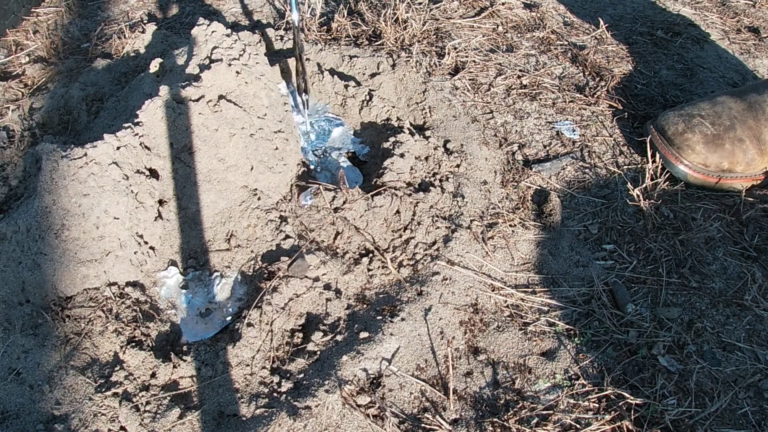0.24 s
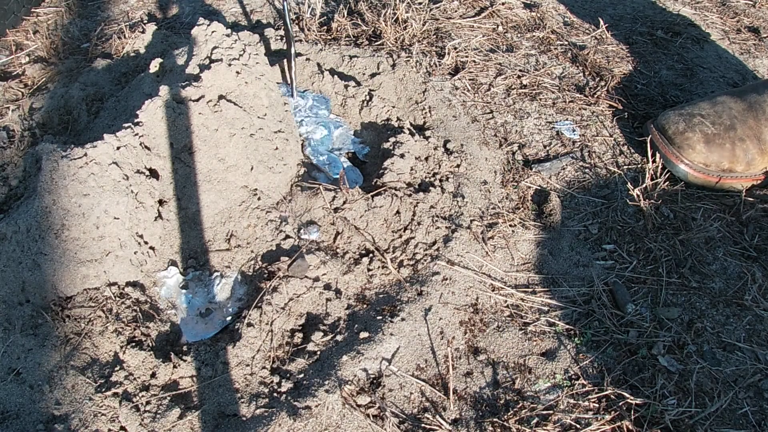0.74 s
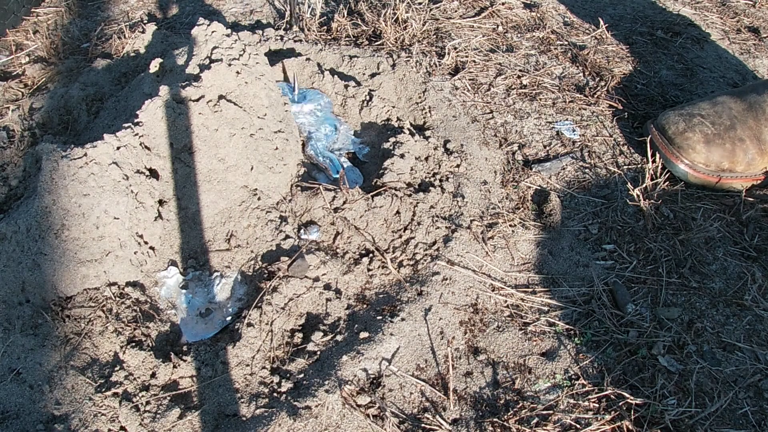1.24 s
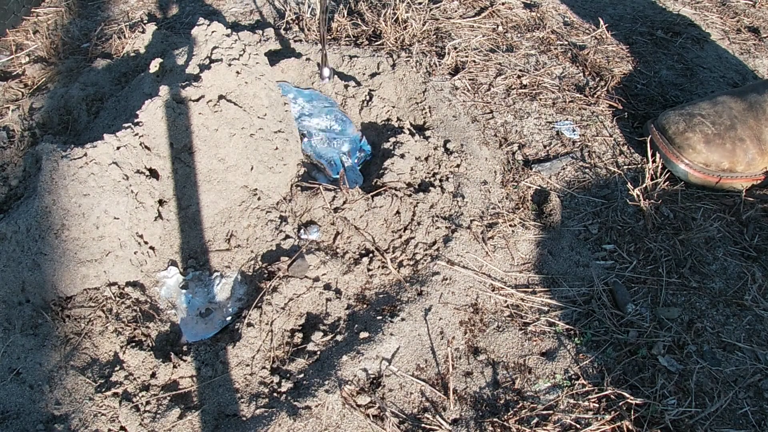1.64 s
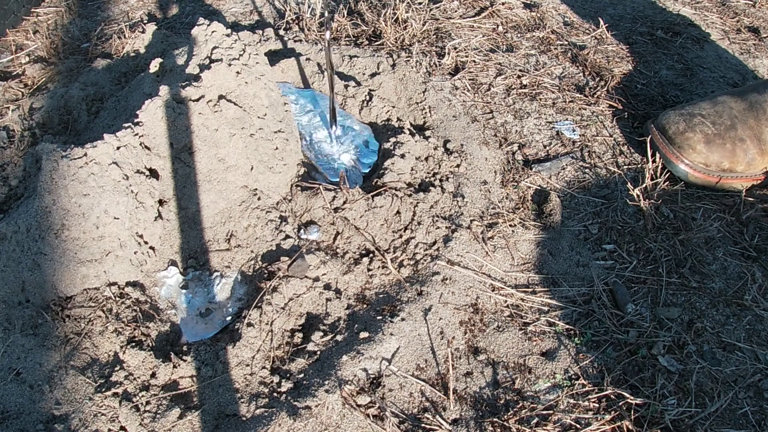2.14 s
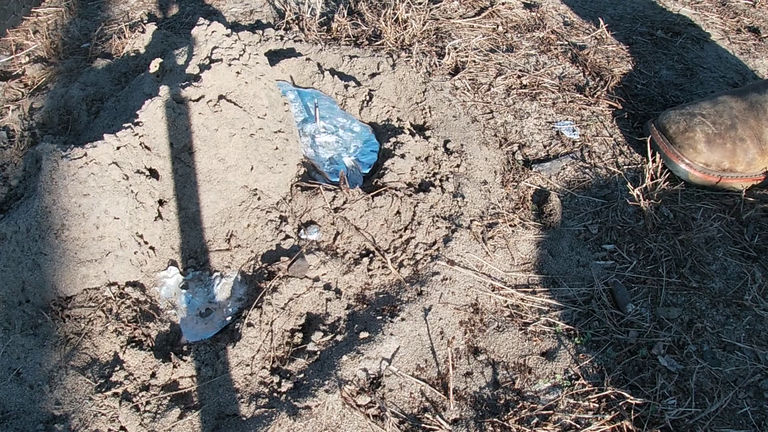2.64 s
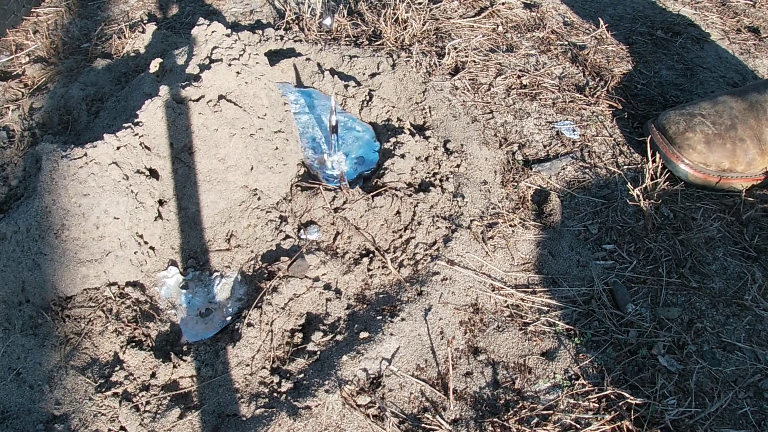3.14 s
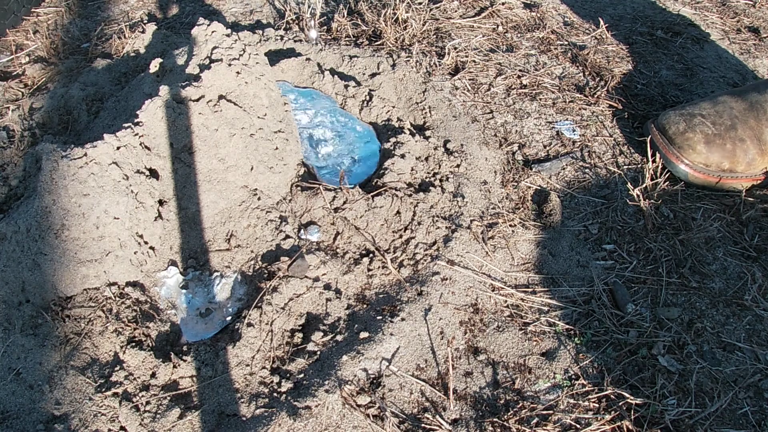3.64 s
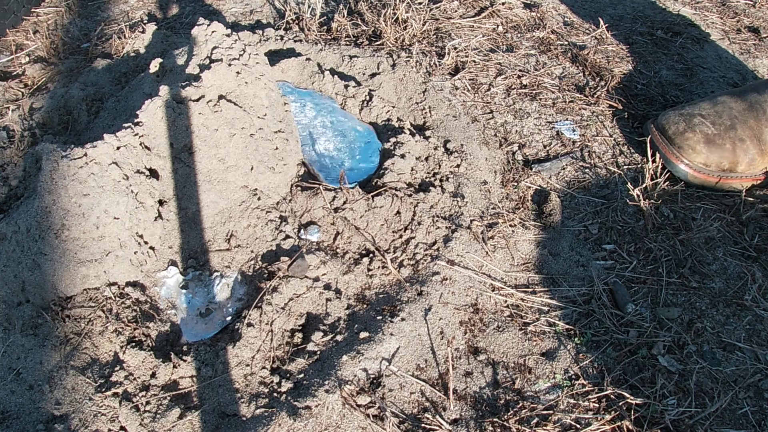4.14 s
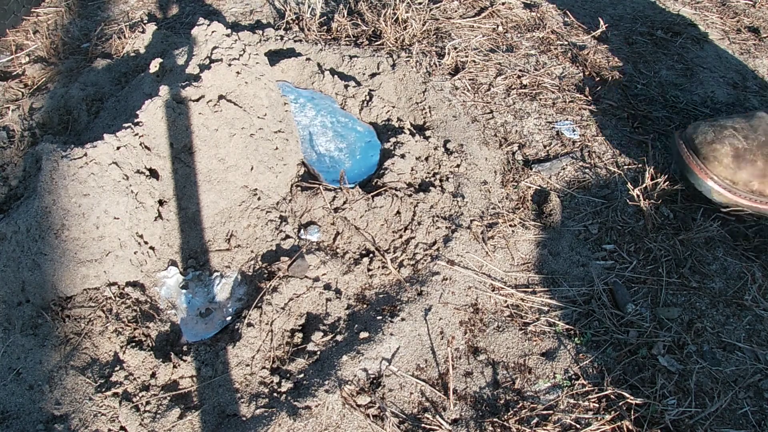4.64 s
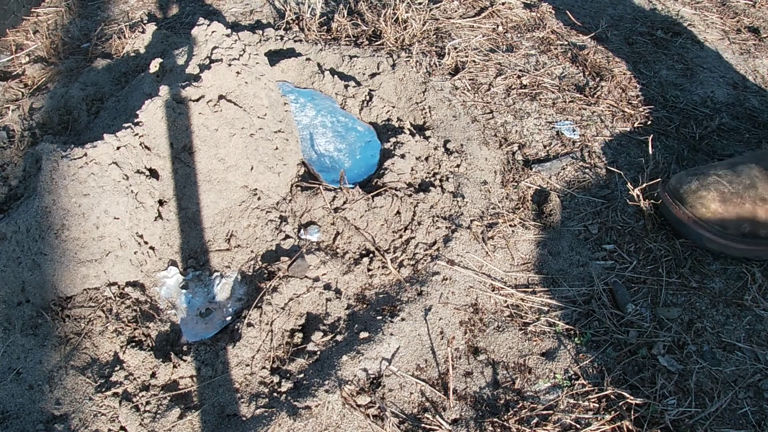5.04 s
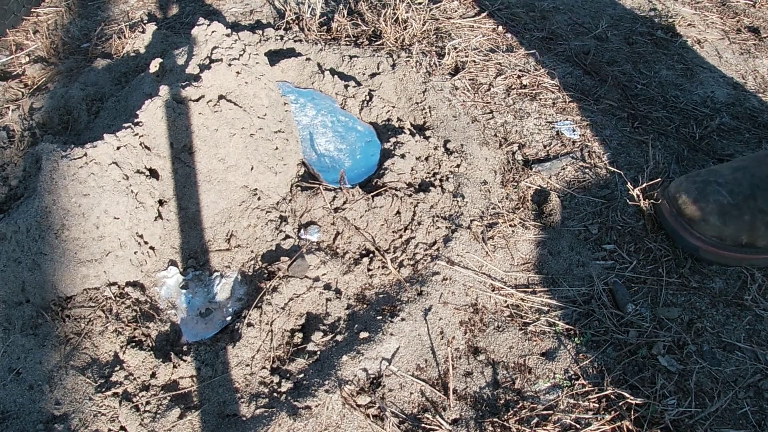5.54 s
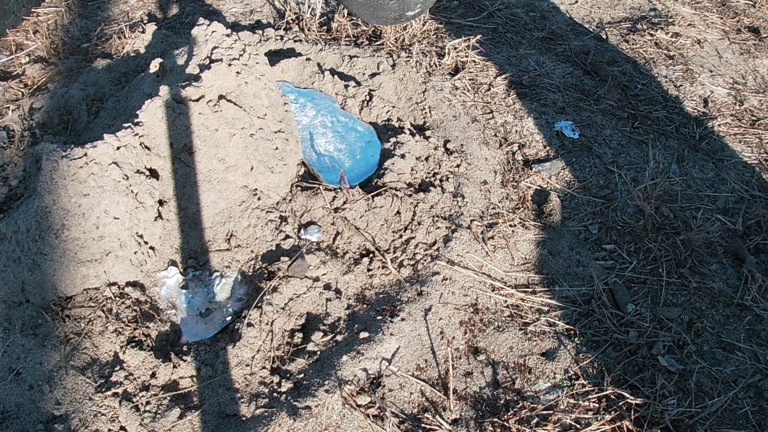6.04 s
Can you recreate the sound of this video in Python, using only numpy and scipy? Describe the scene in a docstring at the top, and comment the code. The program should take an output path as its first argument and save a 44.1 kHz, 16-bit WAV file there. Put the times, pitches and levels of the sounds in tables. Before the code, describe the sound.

Constant deep rushing of a metal-melting furnace flame, fluttering over a motor-like hum that fades and swells, with a sharp tick and a late soft thud.

```python
"""A burner flame, fed by a blower, roars in a small metal-melting furnace outdoors: low noise with gusts and booms.
The blower hums in orders of its turn; the third comes and goes, then swells to a drone.
The burner pipe sings faintly, a wavering tone in narrow noise; a thin overtone of the furnace lies below it.
The air jet is three bands of hiss, chopped once a turn and coloured by resonances.
A few dry ticks and one dull knock come from the work nearby."""
import sys
import numpy as np
from scipy import signal
from scipy.fft import rfft, irfft
from scipy.io import wavfile
from scipy.ndimage import uniform_filter1d

SR = 44100
rng = np.random.default_rng(int(sys.argv[2]) if len(sys.argv) > 2 else 0)


def pcm_store(signal):
    """Save signal as 16-bit PCM."""
    levels = np.round(np.clip(np.atleast_2d(signal), -1, 1) * 32767)
    wavfile.write(sys.argv[1], SR, levels.astype(np.int16).T)


N = 276948
TIME = np.arange(N) / SR
HZ = np.fft.rfftfreq(N, 1 / SR)
# third order of the hum, ringing in the furnace: (time [s], level [dB rms])
DRONE = [(0, -42), (.58, -27.5), (1.1, -42), (1.6, -37), (2.15, -42), (3.3, -31), (3.65, -34), (3.92, -38),
         (4.13, -30), (4.25, -34), (4.38, -27.5), (4.59, -33), (4.65, -25), (4.78, -22), (4.9, -27),
         (5.15, -24.5), (5.55, -24.5), (5.65, -25.5), (5.75, -22.5), (5.98, -24), (6.25, -21)]


def flame(base_db=-23.5, yield_db=-0.96, flutter_db=0.97, gust_db=1.0, surge_db=0.83, gust_above_hz=260):
    """Turbulent burning: a low roar that flutters, gusts in its upper part, booms and eases as the drone swells."""
    # roar spectrum: (frequency [Hz], relative density [dB per Hz])
    roar_spectrum = [(10, -34.5), (25, -21), (50, -11), (90, -3), (140, -1), (210, 2), (255, -2),
                     (297, -13), (335, -11), (400, -19), (540, -26.5), (650, -25), (740, -44.5),
                     (1200, -58), (8000, -110)]
    # booms: (peak time [s], time to either side [s], frequency [Hz], half-width [Hz], level [dB rms])
    boom_rows = [(2.0, 1.33, 150, 24, -33), (3.4, 1, 337, 24, -44), (4.13, 0.03, 198, 19, -23),
                 (4.5, 0.042, 146, 7.4, -24), (5.5, 0.86, 434, 38, -47.5), (5.68, 0.064, 138, 20, -23)]
    roar = noise(spectrum(roar_spectrum))
    high_pass = 1 - 1 / (1 + (HZ / gust_above_hz) ** 8)
    upper = irfft(rfft(roar) * high_pass, N)
    lower = roar - upper
    roar = lower + upper * amp(gust_db * wander(16))
    booms = sum(amp(db) * bell(TIME, s, span_s) * resonance(hz, width_hz)
                for s, span_s, hz, width_hz, db in boom_rows)
    level_db = base_db + yield_db * swelling()
    level_db = level_db + flutter_db * wander(19) + surge_db * wander(1.6)
    return roar * amp(level_db) + booms


def swelling():
    """How far the drone has swelled: its amplitude relative to its peak, 0 to 1."""
    level_db = curve(DRONE)
    return amp(level_db - level_db.max())


def hum(turns, waver_db=1.0, drone_waver_db=0.2, drone_slip_cycles=0.037):
    """Orders of the blower's turn, shaken by the flame; the third wavers in strength and phase."""
    # steady orders: (multiple of turn rate [-], level [dB rms])
    steady_orders = [(1, -36), (2, -39), (5, -50)]
    orders = sum(amp(db + waver_db * wander(13)) * np.sin(2 * np.pi * (k * turns + rng.random()))
                 for k, db in steady_orders)
    third = np.sin(2 * np.pi * (3 * turns + drone_slip_cycles * wander(9)))
    third_gain = amp(curve(DRONE) + drone_waver_db * wander(9.3))
    return np.sqrt(2) * (orders + third * third_gain)


def pipe(sing_db=-42.5, fade_db_per_s=0.4, tone_db=-1.0, flutter_db=0.87, tone_flutter_db=2):
    """Air sings in the burner pipe: a wavering tone inside a fuzz of noisy resonances; the furnace adds an overtone."""
    # fuzz: (frequency [Hz], half-width [Hz], relative level [dB])
    fuzz_modes = [(865, 34, -2), (879, 33, -2)]
    # lulls: (deepest time [s], time to either side [s], change [dB])
    lull_rows = [(4.6, .6, -0.5), (5.3, 0.39, -4.5), (6.28, .2, -3.5)]
    # furnace overtone: (frequency [Hz], half-width [Hz])
    overtone_mode = (461.5, 14.4)
    # furnace overtone: (time [s], level [dB rms])
    overtone_level = [(.7, -48.5), (1.65, -46), (2.6, -44.5), (3.7, -51), (5.3, -44.5), (6.28, -51.5)]
    fuzz = sum(amp(db) * resonance(hz, width_hz) for hz, width_hz, db in fuzz_modes)
    pitch_hz = 888 + 7 * wander(7) + 12 * wander(35)
    tone = np.sqrt(2) * np.sin(2 * np.pi * np.cumsum(pitch_hz) / SR)
    lull_db = sum(db * bell(TIME, s, span_s) for s, span_s, db in lull_rows)
    # the lull acts on the tone and again on the whole, so the tone sinks furthest
    tone = tone * amp(tone_db + lull_db + tone_flutter_db * wander(30))
    level_db = sing_db - fade_db_per_s * TIME + lull_db + flutter_db * wander(43)
    whistle = evened(fuzz + tone) * amp(level_db)
    overtone = amp(curve(overtone_level)) * resonance(*overtone_mode)
    return whistle + overtone


def air(turns, rush_chop=0.021, nozzle_chop=0.047, hiss_chop=0.16, flicker_db=0.72,
        rush_trim_db=-0.52, nozzle_trim_db=0.22, hiss_trim_db=0.5):
    """The air jet: three bands of noise that throb once a blower turn, most deeply in the treble."""
    # spectra of the bands: (frequency [Hz], relative density [dB per Hz])
    rush_spectrum = [(100, -43), (400, -25.5), (700, -3.5), (1000, -1.5), (1250, -6), (1600, -2), (2100, 0),
                     (2400, -0.5), (2900, -23), (4000, -14), (7000, -45), (12000, -78.5)]
    nozzle_spectrum = [(1000, -66), (1800, -41.5), (2450, -11), (2680, 2.5), (3100, -5), (3400, -2.5),
                       (3900, -11.5), (6000, -50.5), (12000, -82)]
    hiss_spectrum = [(500, -49), (1500, -23.5), (3000, -6.5), (3600, -2), (4500, 1.5), (5000, -2),
                     (5550, -5.5), (6500, -2.5), (7700, -3), (8200, -8.5), (8800, -14.5), (10200, -23.5),
                     (11000, -31.5), (12300, -32), (15500, -41)]
    # levels of the bands before trim: (time [s], level [dB rms])
    rush_level = [(0.1, -43), (0.17, -42.5), (2.26, -42), (3.11, -40.5), (5.04, -41.5), (5.43, -40),
                  (6.13, -41), (6.2, -42.5)]
    nozzle_level = [(0.1, -45), (2.72, -44.5), (3.02, -42), (4.11, -45.5), (4.18, -49.5), (4.65, -51),
                    (5.37, -43.5), (6.08, -44), (6.2, -49.5)]
    hiss_level = [(0.0, -47), (0.35, -44), (0.49, -45), (1.31, -46), (1.52, -48), (2.64, -44),
                  (3.09, -41.5), (3.43, -44.5), (3.93, -41.5), (4.11, -42), (4.6, -49.5), (4.93, -44),
                  (5.21, -45.5), (5.33, -43), (6.09, -45.5), (6.28, -45)]
    # burner tube and furnace mouth resonances: (frequency [Hz], full width [Hz], gain [dB])
    colour_modes = [(998, 41, -4), (1075, 54, 1.5), (1244, 84, 4), (1355, 60, 5.5), (1940, 220, 0.5),
                    (2280, 130, -5), (2710, 110, 1), (2940, 80, -2.5), (2974, 67, 7), (3095, 60, 5.5),
                    (3850, 220, -1.5), (6270, 240, 2.5), (6640, 250, -4), (6910, 130, 4.5)]
    colour_db = sum(db / (1 + (2 * (HZ - hz) / width_hz) ** 2) for hz, width_hz, db in colour_modes)
    throb = np.cos(2 * np.pi * turns) * (1 + 0.2 * wander(20))
    throb = throb + 0.15 * np.cos(np.pi * turns)  # strong and weak turns alternate

    def band(points, level, trim_db, chop):
        """One coloured band of noise, chopped by the throb."""
        return noise(spectrum(points) + colour_db) * amp(curve(level) + trim_db) * (1 + chop * throb)

    rush = band(rush_spectrum, rush_level, rush_trim_db, rush_chop)
    nozzle = band(nozzle_spectrum, nozzle_level, nozzle_trim_db, nozzle_chop)
    hiss = band(hiss_spectrum, hiss_level, hiss_trim_db, hiss_chop)
    return drifting(rush + nozzle + hiss * amp(flicker_db * wander(27)))


def drifting(x, patchy_db=1.63, dull_above_hz=8000):
    """The jet's colour shifts: resonances swell, glide and fade, the top dulls briefly, fine ripples come and go."""
    # whistling bands: (peak time [s], time to either side [s], frequency [Hz], glide [Hz/s], width [Hz], gain [dB])
    swell_rows = [(.4, 1, 1040, -5, 60, 8.5), (.88, 0.51, 1392, 0, 69, 8), (.7, 1.1, 2380, 0, 55, 6),
                  (1.1, 0.47, 2860, -64, 300, 4), (1.2, 1.3, 8100, -150, 250, 6),
                  (1.5, 0.52, 3340, -52, 160, 2), (1.7, .35, 1100, -3, 170, 2.5),
                  (2.2, 0.55, 2000, -60, 300, 3.5), (2.4, 0.78, 3060, 1, 150, 4.5),
                  (3.05, 0.35, 1840, 48, 520, 3.5), (3.25, 0.3, 4150, -2, 800, 3),
                  (3.05, 0.26, 6220, -1, 280, 5), (3.1, 0.32, 9150, -1, 240, 5),
                  (3.35, 0.81, 1545, -170, 220, 4), (3.9, 0.65, 2070, 95, 220, 5),
                  (4.15, 0.35, 760, 2, 90, 7.5), (5.3, 1.1, 1070, 0, 91, 5),
                  (5.38, 0.11, 1360, -150, 100, 8), (5.55, 0.59, 2520, -6, 300, 3),
                  (6.05, .35, 2140, -1, 160, 5.5)]
    # dulling of the top: (deepest time [s], time to either side [s], change [dB])
    dull_rows = [(1.45, .1, -1), (4.5, 0.076, -5.5), (5.12, .07, -9)]
    hz, t, z = signal.stft(x, SR, nperseg=1024, noverlap=768)
    ripples = uniform_filter1d(rng.standard_normal(z.shape), size=2, axis=0)  # smooth over bins
    ripples = evened(uniform_filter1d(ripples, size=110, axis=1))  # smooth over frames
    swells_db = sum(db * bell(hz[:, None], top_hz + glide * (t - s), width_hz / 2) * bell(t, s, span_s)
                    for s, span_s, top_hz, glide, width_hz, db in swell_rows)
    treble = 1 - 1 / (1 + (hz / dull_above_hz) ** 6)
    dulls_db = np.outer(treble, sum(db * bell(t, s, span_s) for s, span_s, db in dull_rows))
    shaped = z * amp(swells_db + dulls_db + patchy_db * ripples)
    return signal.istft(shaped, SR, nperseg=1024, noverlap=768)[1][:N]


def ticks(rise_s=0.00008):
    """Dry snaps: short sines under a rounded, fast-dying envelope."""
    # ticks: (time [s], envelope peak [dB], pitch [Hz])
    tick_rows = [(1.276, -41, 9000), (2.3355, -30, 8000), (2.379, -35.5, 9500), (3.101, -41, 9500),
                 (3.149, -40, 9500), (3.3388, -15, 3020), (3.3391, -33, 9300), (3.3437, -41, 8800)]
    out, t = np.zeros(N), TIME[:256]
    envelope = t / rise_s * np.exp(1 - t / rise_s)
    for s, db, hz in tick_rows:
        add(out, s, amp(db) * envelope * np.sin(2 * np.pi * hz * t))
    return out


def knock(attack_s=0.0012):
    """One soft blow on something well damped: a few modes that die fast."""
    # blow: (time [s], level [dB])
    blow = (5.985, -16.5)
    # modes: (frequency [Hz], relative level [dB], 60 dB decay time [s])
    modes = [(605, 0.5, 0.016), (990, 1, 0.006)]
    out, t = np.zeros(N), TIME[:SR // 8]
    s, level_db = blow
    ring = sum(amp(db) * np.exp(-np.log(1000) * t / t60_s) * np.sin(2 * np.pi * hz * t)
               for hz, db, t60_s in modes)
    add(out, s, amp(level_db) * np.minimum(t / attack_s, 1) * ring)
    return out


def amp(db):
    """Decibels to gain."""
    return 10 ** (np.asarray(db) / 20)


def evened(x):
    """Scales to rms 1."""
    return x / np.sqrt(np.mean(x ** 2) + 1e-20)


def curve(rows):
    """A (time, value) table, read at every sample."""
    return np.interp(TIME, *np.transpose(rows))


def spectrum(points):
    """Joins (Hz, dB) points on a log-frequency axis."""
    hz, db = np.transpose(points)
    return np.interp(np.log(HZ + 1), np.log(hz), db)


def noise(db):
    """Noise of rms 1 with the given spectrum."""
    return evened(irfft(rfft(rng.standard_normal(N)) * amp(db), N))


def wander(rate_hz):
    """Slow random motion of rms 1, rolled off steeply above the rate."""
    return noise(-10 * np.log10(1 + (HZ / rate_hz) ** 6))


def resonance(hz, width_hz):
    """Noise of rms 1 in one narrow resonance, 6 dB down a width to either side."""
    return noise(-20 * np.log10(1 + ((HZ - hz) / width_hz) ** 2))


def bell(x, centre, span):
    """A smooth bump of height 1."""
    return np.exp(-((x - centre) / span) ** 2)


def add(mix, s, sound):
    """Mixes a sound in at a time."""
    part = mix[round(s * SR):][:len(sound)]
    part += sound[:len(part)]


def scene(stray_hz=0.2095):
    """Open ground: everything arrives dry; hum and air share the blower's straying turn."""
    # blower speed, which sags now and then: (time [s], rate [turns/s])
    blower_speed = [(3.9, 61.55), (4.25, 60.8), (4.65, 61.0), (5.05, 61.6), (5.95, 61.6), (6.28, 60.8)]
    turns = np.cumsum(curve(blower_speed) + stray_hz * wander(0.94)) / SR
    return (flame() + hum(turns) + pipe() + air(turns) + ticks() + knock())[None]


def record(dry, edge_hz=15700):
    """The recorder's band limit."""
    low_pass = signal.firwin(511, edge_hz, window=("kaiser", 9), fs=SR)
    return signal.oaconvolve(dry, low_pass[None], "same")


dry = scene()
out = record(dry)
pcm_store(out)
```